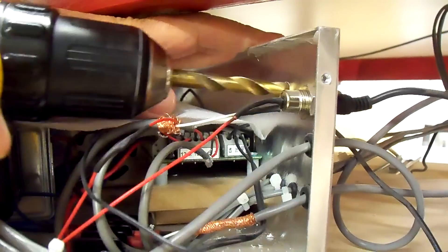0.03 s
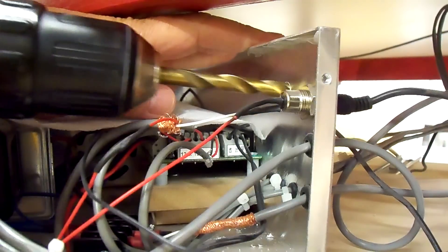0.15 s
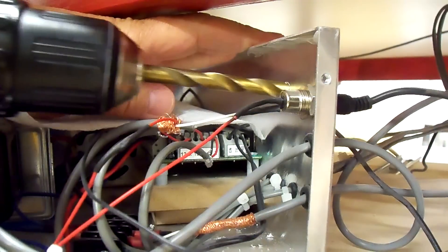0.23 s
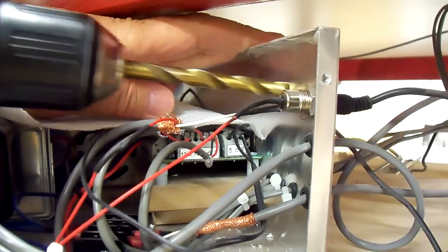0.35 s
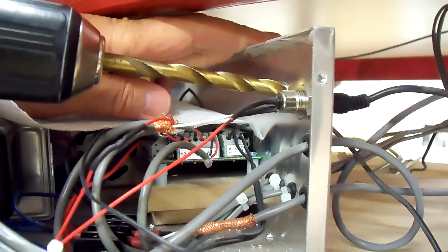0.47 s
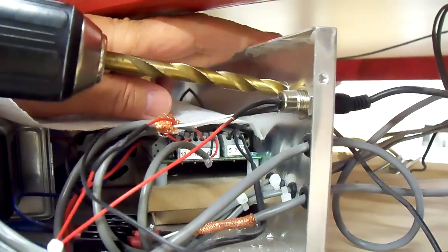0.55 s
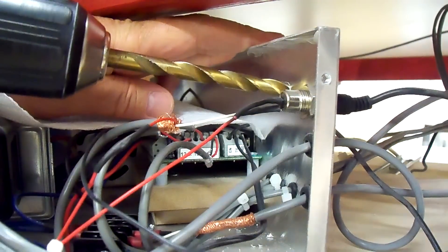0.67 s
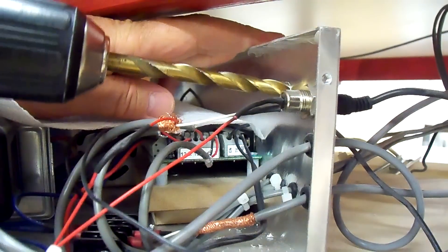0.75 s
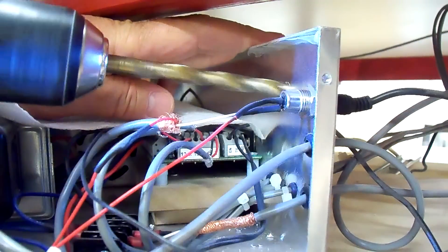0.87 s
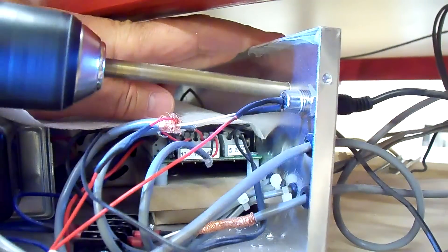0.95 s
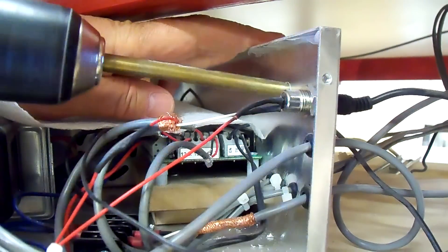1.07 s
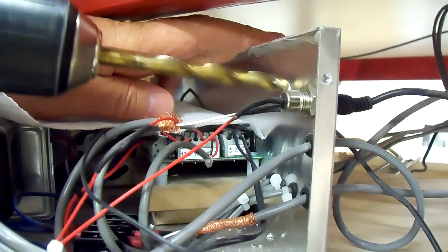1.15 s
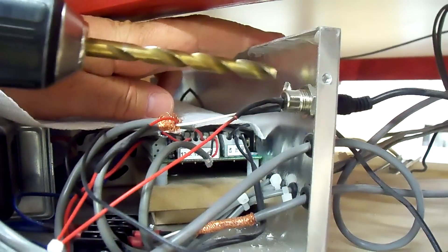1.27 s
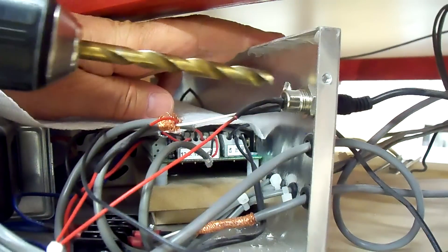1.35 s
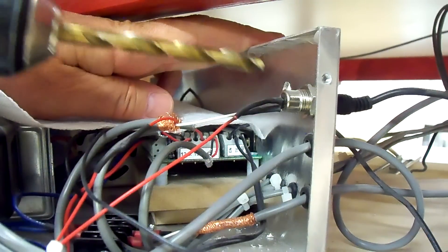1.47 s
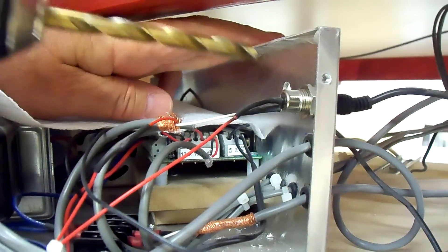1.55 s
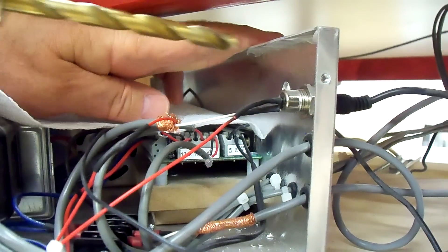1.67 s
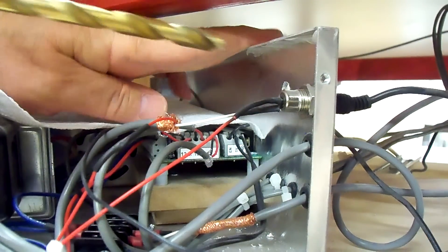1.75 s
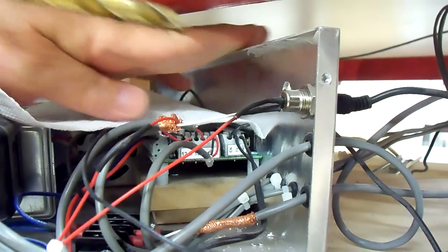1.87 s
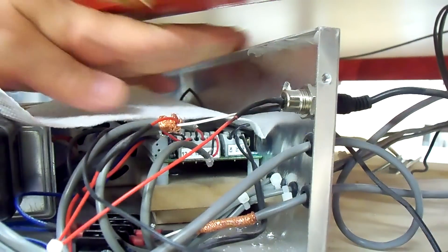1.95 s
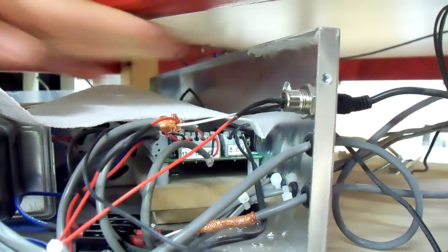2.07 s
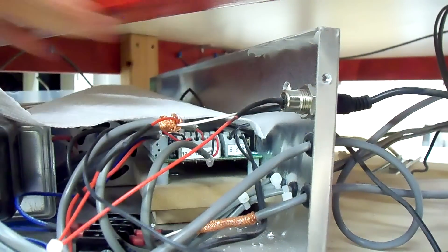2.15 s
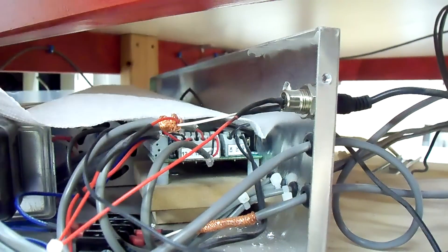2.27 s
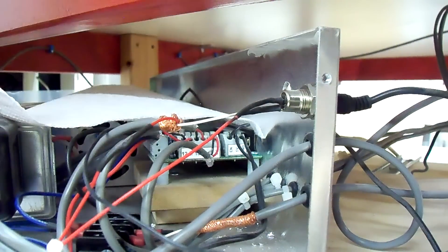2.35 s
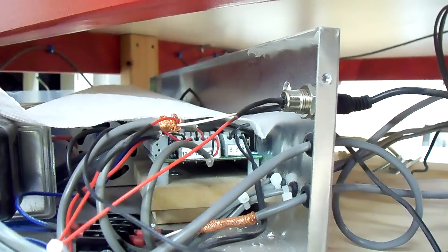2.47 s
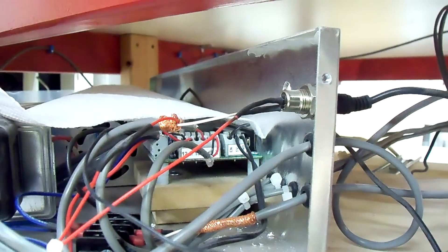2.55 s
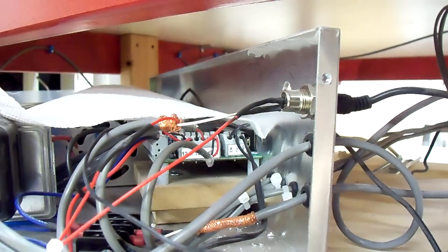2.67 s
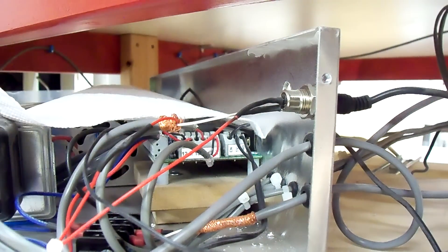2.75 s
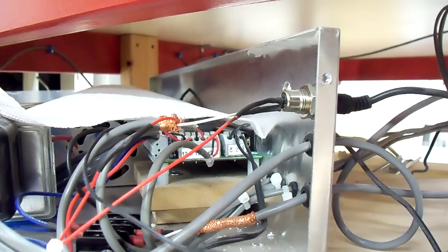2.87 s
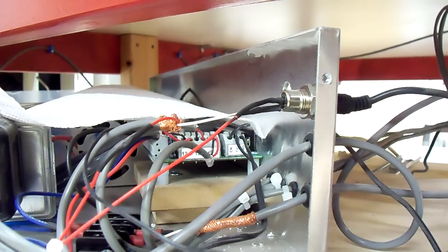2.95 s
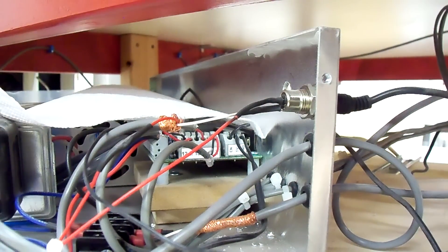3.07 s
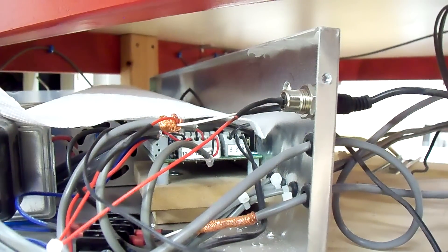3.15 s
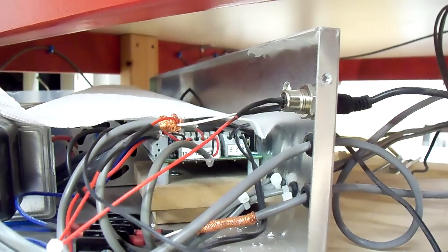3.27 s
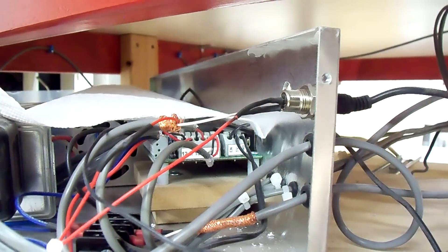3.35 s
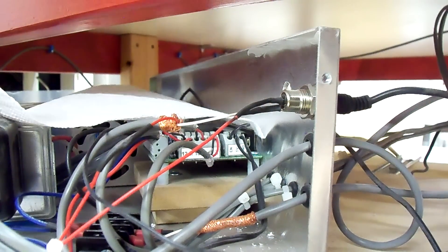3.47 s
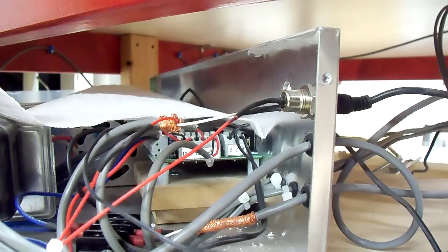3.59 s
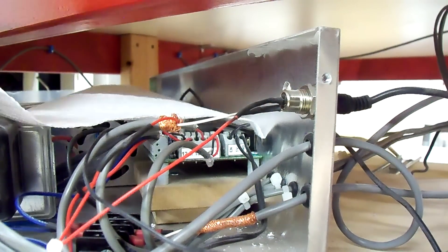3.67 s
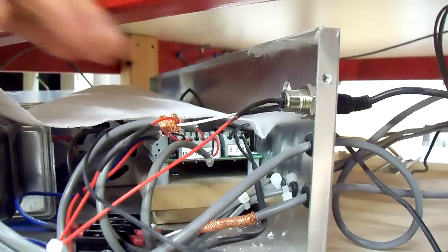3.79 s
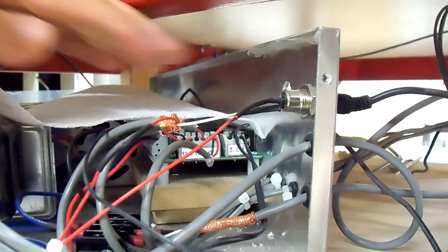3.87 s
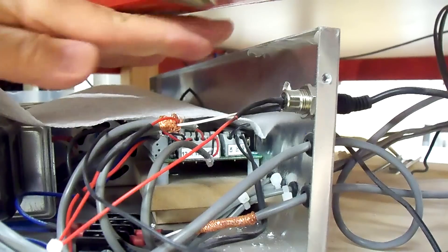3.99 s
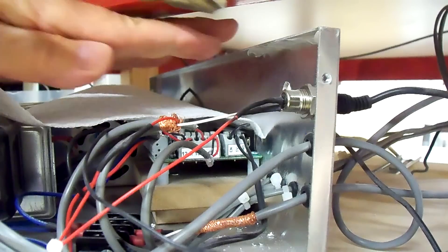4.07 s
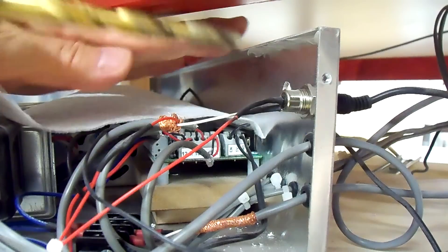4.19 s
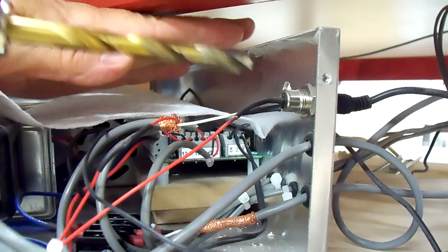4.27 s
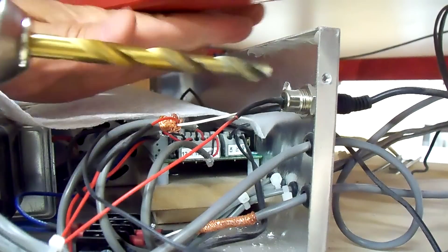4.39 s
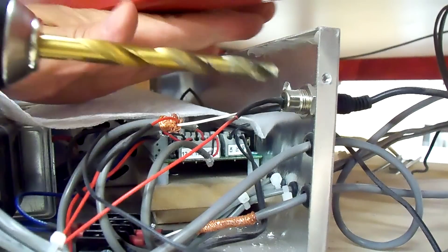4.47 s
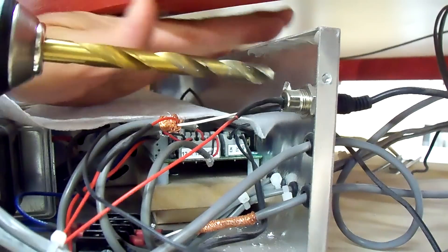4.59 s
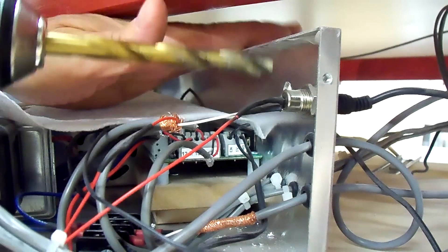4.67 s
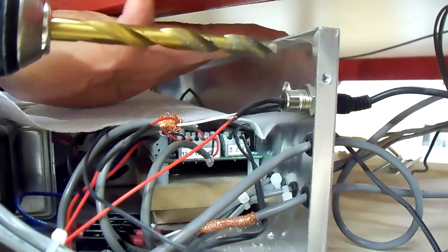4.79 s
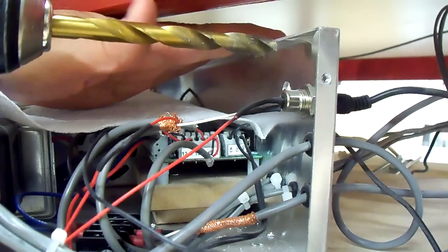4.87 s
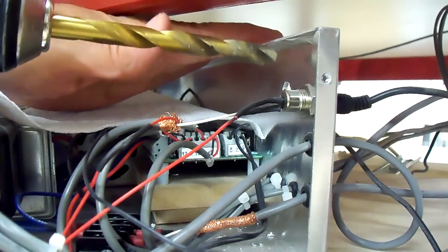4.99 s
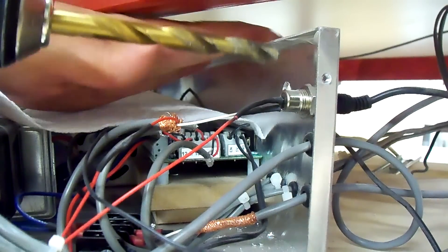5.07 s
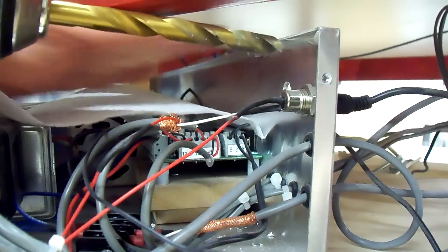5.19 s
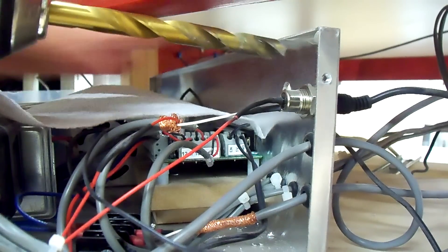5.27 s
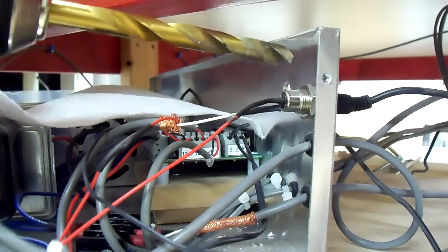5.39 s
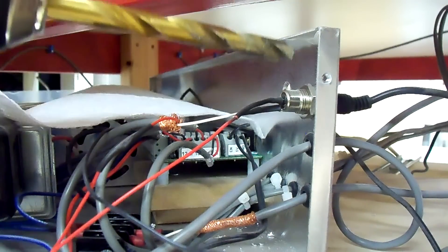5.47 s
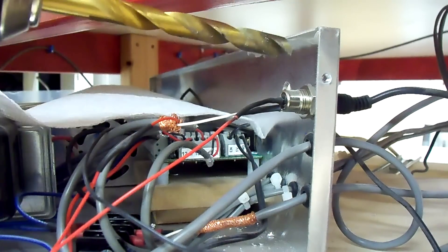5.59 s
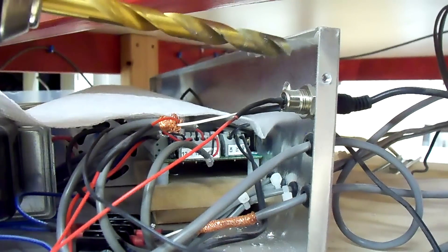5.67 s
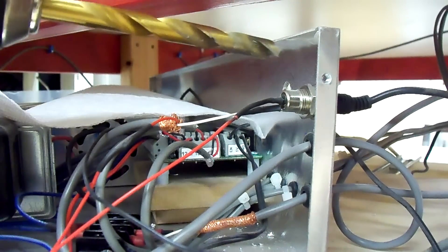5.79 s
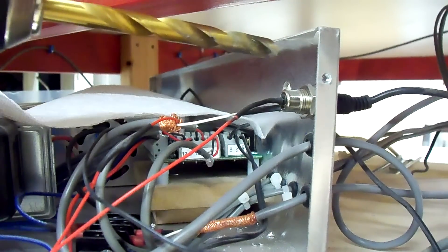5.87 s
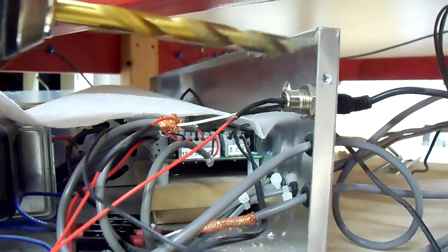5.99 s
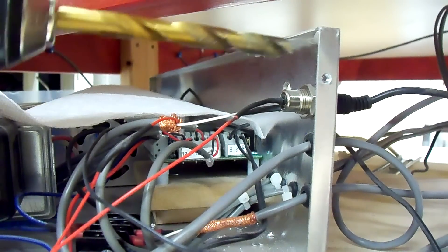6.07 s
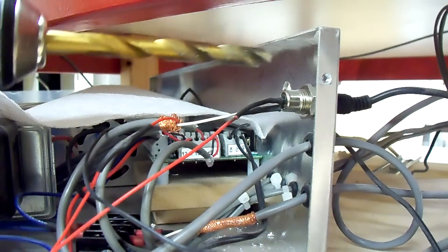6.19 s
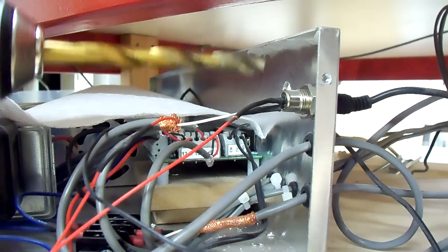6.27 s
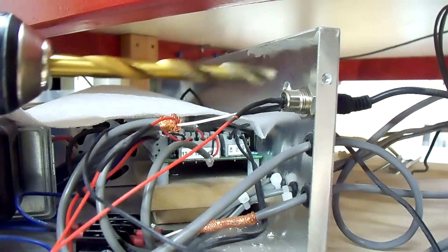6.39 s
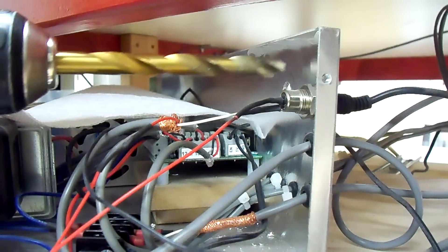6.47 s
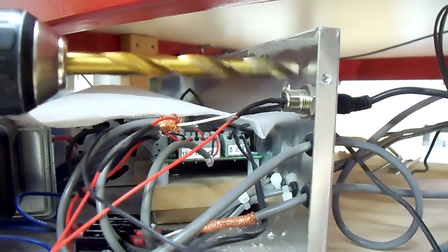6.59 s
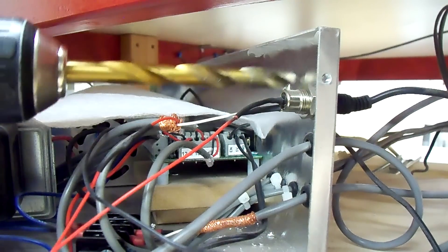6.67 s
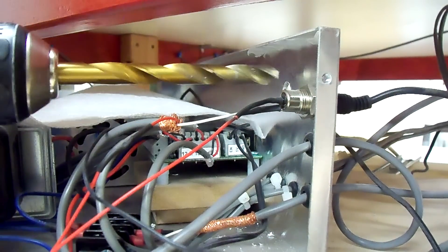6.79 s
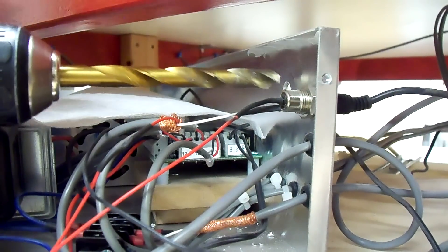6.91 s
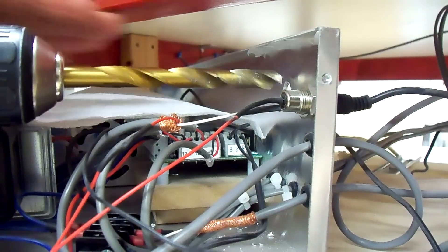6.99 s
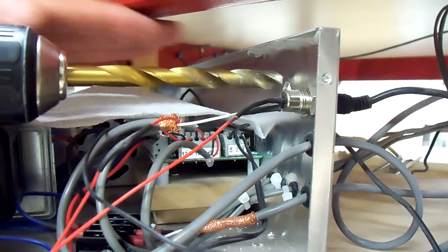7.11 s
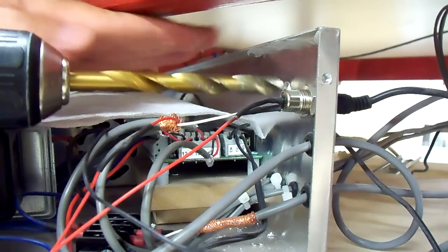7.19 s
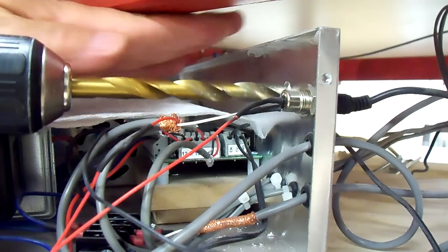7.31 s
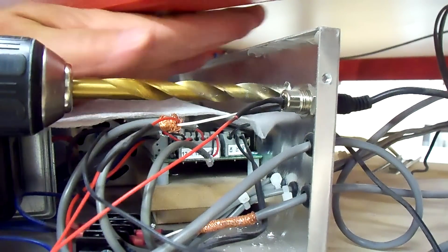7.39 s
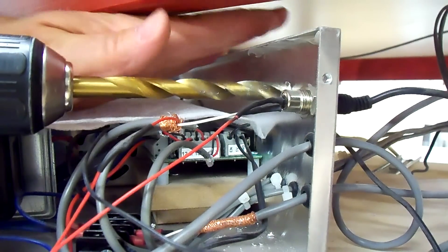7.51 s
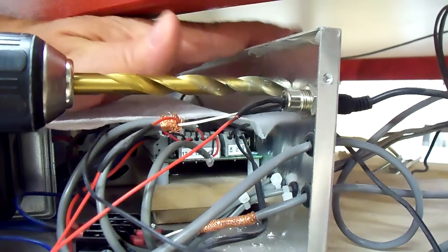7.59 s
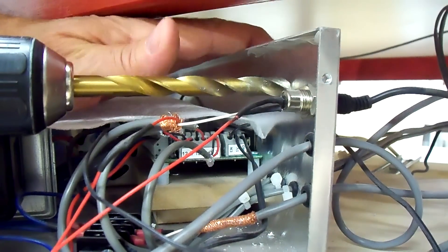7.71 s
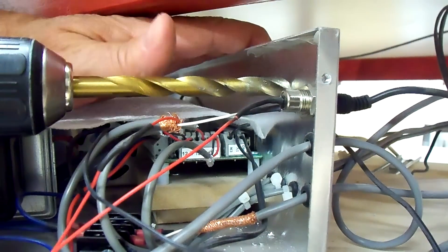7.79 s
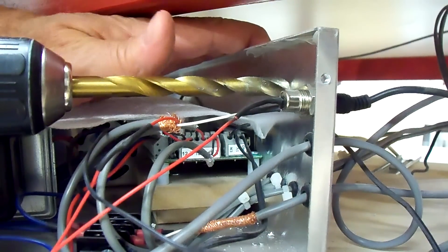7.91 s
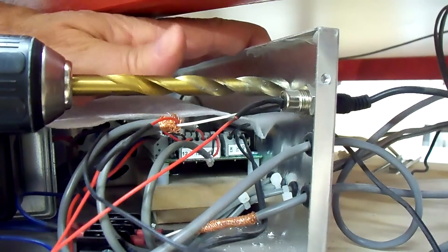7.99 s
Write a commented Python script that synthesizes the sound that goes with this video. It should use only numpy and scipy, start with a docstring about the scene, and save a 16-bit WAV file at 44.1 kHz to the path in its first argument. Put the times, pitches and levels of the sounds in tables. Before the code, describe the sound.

A sharp metallic knock, then a quarter-second cordless drill burst clattering in a metal box, followed by paper rubs, light clicks and a hissing bit slide.

```python
"""Knocks and scrapes come first: a cordless drill's bit in a hole in the wall of an aluminium box, heard close.
The motor spins for a quarter second until the bit catches; rubs, clicks and a sliding bit follow.
A hand rubs a sheet of paper in the box, amid faint swells of noise, all of dense grains; knocks ring wall modes.
The drill is gear clatter and shaft tones that follow one speed curve; a small workroom adds its tail.
Behind lie coloured hiss, air, rumble and mains hum, which step up at 2.7 s and then swell."""
import sys
import numpy as np
from scipy import signal
from scipy.fft import rfft, irfft, next_fast_len
from scipy.io import wavfile
from scipy.ndimage import uniform_filter1d

SR = 44100
rng = np.random.default_rng(int(sys.argv[2]) if len(sys.argv) > 2 else 0)


def int16_out(signal):
    """Quantize to a 16-bit WAV file."""
    q = np.round(np.clip(np.atleast_2d(signal).T, -1, 1) * 32767)
    wavfile.write(sys.argv[1], SR, q.astype(np.int16))


N = 354991
TIME = np.arange(N) / SR

# All levels of the work at the box are ahead of the balance in scene().
# modes of the box wall: (frequency [Hz], level [dB], t60 [s])
PANEL = [(720, -3, .04), (889.5, -7.5, .04), (1104, -2.5, 0.027), (1220, -4, .04), (1371, -3, 0.029),
         (1497, -1, 0.028), (1699, -2.5, 0.019), (1993, -4.5, .035), (2196, 2, 0.015), (2407, -8, 0.033),
         (2730, 3.5, 0.014), (3100, -1, 0.015), (3530, 0.5, 0.0091), (3804, 1, 0.021), (4250, -4.5, .015)]
# colour of a low thud: (frequency [Hz], density [dB per Hz])
THUD = [(30, -14), (150, -1.5), (300, 1.5), (700, 3), (1100, -6), (2500, -41.5)]
# colour of a bright tick: (frequency [Hz], density [dB per Hz])
TICK = [(700, -26), (2000, -9), (3500, -6), (5300, 0.5), (6500, -6), (7900, -1.5), (10000, -4),
        (14000, -5.5)]


def amp(db):
    """Decibels to gain."""
    return 10 ** (np.asarray(db) / 20)


def unit(x):
    """Scales to an rms of one."""
    return x / np.sqrt(np.mean(x ** 2) + 1e-20)


def read(points, hz):
    """Reads a curve on a log-frequency axis."""
    f, value = np.transpose(points)
    return np.interp(np.log(hz + 1), np.log(f + 1), value)


def add(mix, s, sound):
    """Mixes a sound in at a time in seconds."""
    part = mix[max(0, round(s * SR)):][:len(sound)]
    part += sound[:len(part)]


def colour(x, points):
    """Filters a signal by a spectrum and scales it to an rms of one."""
    size = next_fast_len(len(x))
    gain = amp(read(points, np.fft.rfftfreq(size, 1 / SR)))
    return unit(irfft(rfft(x, size) * gain, size)[:len(x)])


def noise(points, size=N):
    """Coloured noise at an rms of one."""
    return colour(rng.standard_normal(size), points)


def wander(size, smooth):
    """Random drift of rms one, smoothed over a number of samples."""
    return unit(uniform_filter1d(rng.standard_normal(size), max(int(smooth), 1)))


def envelope(start, attack_s, end, release_s, db_per_s):
    """A straight attack, a hold that drifts in level, and an exponential release."""
    attack = np.clip((TIME - start) / attack_s, 0, 1)
    held = np.clip(TIME, start, end) - start
    release = np.exp(-np.maximum(TIME - end, 0) / release_s)
    return attack * amp(db_per_s * held) * release


def grains(per_s, spread_db, size=N):
    """Tiny impacts of uneven strength and either sign at random moments."""
    strength = amp(spread_db * np.minimum(rng.exponential(1, size), 4))
    strength = strength * rng.choice([-1, 1], size)
    return unit(strength * (rng.random(size) < per_s / SR))


def ring(x, modes):
    """Drives a set of dying modes, each at a random phase for the point of contact."""
    t = np.arange(SR // 8) / SR
    response = np.zeros(len(t))
    for hz, db, t60 in modes:
        response += amp(db - 60 * t / t60) * np.sin(2 * np.pi * (hz * t + rng.random()))
    return signal.oaconvolve(x, response)[:len(x)]


def favour(x, hz, q):
    """A broad resonance: each contact spot favours the modes round one frequency."""
    b, a = signal.iirpeak(min(hz, SR / 4), max(q, .4), fs=SR)
    return signal.lfilter(b, a, x)


def blow(x, db):
    """Gives a hit the energy of a hundredth of a second at this rms level."""
    return amp(db) * x * np.sqrt(SR / 100 / (np.sum(x ** 2) + 1e-20))


def room_level(before_db, after_db, swell_db):
    """A level in dB that holds, steps up and then swells ever faster by swell_db."""
    step_s, step_rise_s, swell_power = 2.707, 0.011, 2.7
    step = np.clip((TIME - step_s) / step_rise_s, 0, 1)
    swell = np.maximum((TIME - step_s) / (TIME[-1] - step_s), 0) ** swell_power
    return before_db + (after_db - before_db) * step + swell_db * swell


def ambience(rumble_trim_db=-1, air_drift_db=1.44, rumble_drift_db=1.0):
    """Smooth coloured hiss over unevenly moving air, lumpy rumble and a sine of mains hum."""
    # colours of the room's three noises: (frequency [Hz], density [dB per Hz])
    hiss_colour = [(300, -4), (800, -3.5), (1500, 5.5), (3000, 3), (6000, -0.5), (10000, -3.5),
                   (14000, -1.5)]
    air_colour = [(90, -15), (160, -1), (230, -1.5), (370, -1), (480, -7), (620, -7), (850, -11.5),
                  (1300, -16.5), (3000, -46)]
    rumble_colour = [(5, -11.5), (20, -1), (40, -1.5), (70, -5), (110, -6.5), (170, -15.5), (400, -40.5)]
    hum_hz, hum_db = 120, -11.5  # level within the rumble layer
    hiss = amp(room_level(-78.5, -59.5, 7)) * noise(hiss_colour)
    air = amp(room_level(-73.5, -57.3, 7.5) + air_drift_db * wander(N, 2700)) * noise(air_colour)
    rumble = amp(rumble_trim_db + rumble_drift_db * wander(N, 4400)) * noise(rumble_colour)
    hum = amp(hum_db) * np.sqrt(2) * np.sin(2 * np.pi * (hum_hz * TIME + rng.random()))
    return hiss + air + amp(room_level(-61, -56, 8)) * (rumble + hum)


def reverb(x, build_s=0.0027):
    """A small workroom: a diffuse noise tail whose treble dies first."""
    # decay of the room: (frequency [Hz], t60 [s])
    room_t60 = [(100, .45), (1000, .31), (4000, .27), (8000, .22), (14000, .21)]
    hz, t, z = signal.stft(rng.standard_normal(SR // 2), SR, nperseg=256)
    tail = signal.istft(z * amp(-60 * t / read(room_t60, hz)[:, None]), SR)[1]
    tail = tail * (1 - np.exp(-np.arange(len(tail)) / SR / build_s))
    return signal.oaconvolve(x, tail / np.linalg.norm(tail))[:N]


def walls(x):
    """Close echoes between the box's walls comb the sound, so that it is hollow and tinny."""
    # echoes: (delay [s], gain [linear])
    echoes = [(.001135, 0.1), (.00227, 0.066), (.0046, .14)]
    return x + sum(gain * np.interp(TIME - delay, TIME, x, left=0) for delay, gain in echoes)


def thumps():
    """The whole box rocks on its shelf: a few dying swings of its weight."""
    # swings: (time [s], frequency [Hz], level [dB], t60 [s])
    swings = [(0.484, 47.7, -45, 0.33), (6.661, 74, -35.5, 0.13)]
    out, t = np.zeros(N), np.arange(SR // 2) / SR
    for s, hz, db, t60 in swings:
        add(out, s, amp(db - 60 * t / t60) * np.sin(2 * np.pi * hz * t))
    return out


def friction(hiss, body, spectrum, grains_per_s, spread_db, flutter_db, wall_db, sing_db=-3):
    """Dense grains hiss directly, sound through the box and ring its wall; their level flutters."""
    # colour of the box: (frequency [Hz], density [dB per Hz])
    box_colour = [(100, -6), (400, -1.5), (900, -7), (1350, -0.5), (1580, -5.5), (1900, -5.5), (2650, -4),
                  (3500, -5.5), (6000, -18)]
    # modes of the walls under a rubbing hand: (frequency [Hz], level [dB], t60 [s])
    singing_modes = [(1530, -11, 0.035), (1560, 8, 0.019), (2593, -3, .025), (3500, -4, 0.022),
                     (5300, -5, 0.027), (7760, 0, 0.017)]
    grit = grains(grains_per_s, spread_db) * amp(flutter_db * wander(N, 500))
    leaning = (TIME > 4.5) & (TIME < 5.3)  # the wall sings while the hand leans on it
    singing = leaning * amp(sing_db) * unit(ring(grit, singing_modes))
    box = amp(wall_db) * colour(grit, box_colour) + singing
    return hiss * colour(grit, spectrum) + body * box


def rubs():
    """Rubs and faint swells of noise: each is one arch of level, and overlapping arches add in power."""
    # rubs and faint swells of noise: (time [s], length [s], hiss level [dB], box ring level [dB])
    arches = [(.03, 0.43, -71, -58.5), (1.79, .15, -72, -68), (1.86, .1, -70, -80), (1.95, .12, -67, -76),
              (2.05, 0.47, -74, -79), (2.87, 0.077, -61, -45.5), (2.93, 0.13, -63, -48),
              (3.068, 0.13, -56.5, -48), (3.352, 0.076, -57, -72), (3.52, 0.16, -69, -52.5),
              (3.943, 0.62, -65, -59), (4.559, 0.16, -48.5, -53), (4.806, 0.31, -56, -56),
              (5.03, .17, -50, -50), (5.088, .064, -42.5, -47), (5.135, .083, -45, -60),
              (5.43, .13, -59, -75), (6.0, 0.28, -58, -53), (6.267, 0.14, -54.5, -56),
              (6.437, 0.11, -55.5, -57), (7.12, .075, -54, -72)]
    # colour of their hiss: (frequency [Hz], density [dB per Hz])
    rub_colour = [(600, -5), (2000, -20), (4000, -8.5), (5300, 0.5), (6600, -3), (7800, -2), (9800, -0.5),
                  (11300, 2.5), (14000, 0.5)]
    skew, roundness = 1, 0.78  # a skew above 1 would peak later; a smaller roundness is broader
    hiss, body = np.zeros((2, N))
    for s, length, hiss_db, ring_db in arches:
        phase = np.linspace(0, 1, int(length * SR)) ** skew
        arch = abs(np.sin(np.pi * phase)) ** roundness
        add(hiss, s, (amp(hiss_db) * arch) ** 2)
        add(body, s, (amp(ring_db) * arch) ** 2)
    return friction(np.sqrt(hiss), np.sqrt(body), rub_colour,
                    grains_per_s=11000, spread_db=0.0, flutter_db=1.4, wall_db=-3)


def slide():
    """The flutes slide along the rim of the hole: a sudden hiss that fades as they slow, and stops."""
    # colour of the slide's hiss: (frequency [Hz], density [dB per Hz])
    slide_colour = [(80, -20), (300, -1), (900, -4.5), (1400, -5), (2200, -21), (4000, -10), (8000, -6),
                    (11000, -7), (11900, 0), (12600, -7), (13600, -6.5)]
    start_s, seated_s, end_s = 7.491, 7.512, 7.64  # the box joins in once the tip has dropped in
    attack_s, fade_db_per_s = 0.008, -79
    hiss = amp(-29.2) * envelope(start_s, attack_s, end_s, .013, fade_db_per_s)
    body = amp(-34) * envelope(seated_s, attack_s, end_s, .04, fade_db_per_s)
    return friction(hiss, body, slide_colour,
                    grains_per_s=23000, spread_db=-0.5, flutter_db=1.5, wall_db=-3.5)


def squeaks(unsteady_hz=80, flutter_db=3.6):
    """Steel squeaks as it slips: short gliding whistles, shaky in pitch and strength."""
    # whistles: (time [s], length [s], start [Hz], end [Hz], level [dB])
    whistles = [(0.153, 0.044, 1477, 1190, -56), (0.2, .06, 1373, 1190, -57),
                (0.233, 0.038, 1724, 1710, -53.5), (.303, .022, 1730, 1750, -59),
                (0.375, .022, 5050, 5000, -60), (.406, .031, 5130, 5150, -62), (0.406, .025, 743, 710, -55),
                (0.416, .032, 1370, 1430, -56), (.713, 0.042, 1110, 1060, -64.5),
                (6.282, .08, 2660, 2460, -59), (6.384, .047, 7380, 7220, -58),
                (6.457, 0.067, 1900, 1870, -57.5), (6.49, .05, 7250, 7300, -63),
                (7.296, .022, 1500, 1460, -44), (7.366, 0.024, 1543, 1550, -46)]
    out = np.zeros(N)
    for s, length, start_hz, end_hz, db in whistles:
        size = int(length * SR)
        hz = np.linspace(start_hz, end_hz, size) + unsteady_hz * wander(SR // 8, 53)[:size]
        flutter = amp(flutter_db * wander(SR // 8, 130)[:size])
        whistle = np.sin(2 * np.pi * np.cumsum(hz) / SR) * flutter
        add(out, s, amp(db) * unit(whistle * signal.windows.tukey(size, .6)))
    return out


def scrapes(slips_per_s=1500, spread_db=3, q=3.6, body_db=-4.5):
    """The bit's edge sticks and slips on the metal, and each slip rings the wall."""
    # drags: (time [s], length [s], ring level [dB], ring centre [Hz], hiss level [dB])
    drags = [(.135, 0.26, -59.5, 1430, -66), (.371, .036, -55.5, 1520, -58), (.407, .067, -55, 1470, -58),
             (7.295, 0.019, -43.5, 1400, -51), (7.315, .032, -43, 1400, -52),
             (7.368, .037, -43.5, 1380, -55)]
    out = np.zeros(N)
    for s, length, ring_db, ring_hz, hiss_db in drags:
        size = int(length * SR)
        stroke = np.pad(signal.windows.tukey(size, .4), (0, SR // 20))  # room for the ring to die
        slips = grains(slips_per_s, spread_db, size=len(stroke)) * stroke
        wall = unit(favour(ring(slips, PANEL), ring_hz, q)) + amp(body_db) * colour(slips, THUD)
        hiss = unit(noise(TICK, size=len(stroke)) * stroke)
        padding_gain = np.sqrt(size / len(stroke))
        add(out, s, (amp(ring_db) * wall + amp(hiss_db) * hiss) * padding_gain)
    return out


def strike(s, db, modes, contact_t60, click_db):
    """One clean blow of metal on metal: a noise click and a short ring of modes."""
    out, t = np.zeros(N), np.arange(SR // 8) / SR
    click = noise(TICK, size=len(t)) * amp(-60 * t / contact_t60)
    ringing = ring(signal.unit_impulse(len(t)), modes)
    add(out, s, blow(ringing, db) + blow(click, db + click_db))
    return out


def chink():
    """The chuck's steel jaws chink once, in high modes."""
    # modes of the jaws: (frequency [Hz], level [dB], t60 [s])
    jaws = [(5370, -14, 0.039), (7400, -10, 0.044), (9700, -9, .02), (11370, -4, .03), (12000, 0, 0.055),
            (12765, -11, .04), (13500, -8, .04)]
    return strike(6.0768, -33, jaws, contact_t60=.035, click_db=-5)


def clack():
    """The bit clacks once on the top edge of the wall, in lower modes."""
    # modes of the edge: (frequency [Hz], level [dB], t60 [s])
    edge = [(1100, -5, 0.096), (1290, -4, 0.049), (1390, -1, 0.02), (1480, -2, 0.028), (1600, -5, 0.034),
            (2080, -3, 0.022), (2240, -1.5, 0.041), (2370, -3, .022), (3240, -9, 0.018), (3630, -8, 0.018)]
    return strike(4.689, -28.5, edge, contact_t60=.025, click_db=-7)


def contact(thud_db, ring_db, ring_hz, tick_db, t60, rise_s=0.00053, thud_longer=2.1, chatter=0.54, q=1.7):
    """One contact is a short chatter of noise: a low thud, the wall's ring and a bright tick."""
    t = np.arange(SR // 2) / SR
    attack = 1 - np.exp(-t / rise_s)
    thud = noise(THUD, size=len(t)) * attack * amp(-60 * t / (t60 * thud_longer))
    chattering = rng.standard_normal(len(t)) * amp(-60 * t / (t60 * chatter))
    wall = favour(ring(chattering, PANEL), ring_hz, q)
    tick = noise(TICK, size=len(t)) * attack * amp(-60 * t / t60)
    return blow(thud, thud_db) + blow(wall, ring_db) + blow(tick, tick_db)


def knocks():
    """Bit and chuck knock on the box, the paper snaps and the drill clicks in the grip: brief contacts."""
    # knocks and snaps: (time [s], thud level [dB], ring level [dB], ring centre [Hz],
    # tick level [dB], tick t60 [s])
    hits = [(.001, -32.5, -16.5, 1470, -13, .02), (.0055, -35.5, -19.5, 1740, -17.5, .011),
            (0.0223, -34.5, -27.5, 1870, -23, 0.023), (0.0336, -31, -31, 1800, -25, .014),
            (.463, -44.5, -48.5, 1500, -52, 0.057), (.475, -54, -43.5, 1650, -52, .022),
            (.824, -60, -59.5, 1250, -69, .015), (.9, -57, -54, 2010, -48, .021),
            (.925, -55, -41.5, 2395, -39, .016), (1.157, -48, -23, 1850, -17.5, .02),
            (1.16, -29.5, -22.5, 2190, -16.5, .019), (1.202, -47, -44, 1600, -55, .018),
            (1.212, -55.5, -45, 2340, -39.5, .011), (1.604, -55.5, -69, 950, -82, 0.029),
            (1.69, -60.5, -81, 870, -83, .047), (1.826, -60, -57, 1350, -62, .039),
            (2.979, -43.5, -41, 1100, -45, .06), (2.998, -46, -46, 1100, -49, 0.1),
            (3.114, -62, -42, 2380, -49, 0.04), (3.67, -43, -50, 1830, -41, 0.24),
            (3.8226, -46, -54, 2680, -23.5, .036), (3.824, -37, -36, 1900, -21, 0.33),
            (5.388, -74, -49, 1450, -48.5, .12), (5.847, -40.5, -45.5, 1250, -51, 0.037),
            (6.0634, -38, -34, 1400, -39, 0.04), (6.6503, -50, -29.5, 1750, -38.5, 0.0084),
            (6.663, -43, -43, 1400, -51, .048), (7.405, -40, -32, 1550, -41, .017),
            (7.512, -30.5, -29, 1300, -38, .013), (7.5162, -51, -26.5, 1400, -37.5, 0.021),
            (7.682, -39.5, -38.5, 3170, -44, 0.0074)]
    # light clicks in the grip, all of one colour: (time [s], tick level [dB])
    clicks = [(.844, -60), (4.321, -48.5), (5.124, -41), (5.455, -47), (5.72, -46), (6.276, -47.5),
              (6.357, -46.5), (6.388, -48)]
    out = np.zeros(N)
    for s, *hit in hits:
        add(out, s, contact(*hit))
    for s, db in clicks:
        add(out, s, contact(db - 17, db - 12, 1800, db, .014))
    return out


def drill(clatter_per_s=11000, spread_db=3.0, beat=.25, shake_db=-25, chatter_db=4.4):
    """Brushes and gear teeth clatter, beating once a turn, over uneven shaft tones and a starting whine."""
    # motor and gear tones: (multiple of the shaft [1], level [dB])
    orders = [(1, -6.5), (2, -4.5), (4, -9), (5, -5.5), (6, -2)]
    # colour of the clatter: (frequency [Hz], density [dB per Hz])
    gearbox = [(30, -10.5), (120, -12), (310, 1.5), (420, -4.5), (1100, -6), (1550, -2), (2000, -5.5),
               (2400, -7.5), (3750, -4.5), (4150, -2.5), (5300, 1), (7300, -4), (11000, -3.5), (13600, -3)]
    # colour of the shaking shelf: (frequency [Hz], density [dB per Hz])
    shake_colour = [(10, -12), (35, 1.5), (60, 1), (110, -12), (250, -33)]
    # one pull of the trigger: the motor winds up, and brakes when the bit catches
    pull_s, spin_up_s, spin_up_power = .893, .057, 2.5
    brake_s, braking_s = 1.15, .038
    full_turns_per_s = 328
    lag = np.exp(-(np.maximum(TIME - pull_s, 0) / spin_up_s) ** spin_up_power)
    speed = (1 - lag) * np.exp(-np.maximum(TIME - brake_s, 0) / braking_s)  # share of full speed
    turns = np.cumsum(full_turns_per_s * speed * (1 + .035 * wander(N, 130))) / SR

    # the bit chatters in the hole, so each tone swells and breaks off on its own
    tones = np.zeros(N)
    for k, db in orders:
        tones += amp(db + chatter_db * wander(N, 400)) * np.sin(2 * np.pi * (k * turns + rng.random()))
    strain = 1 + 18 * lag  # the tones are stronger while the motor winds up
    gears = amp(-41.5) * speed ** 4.5 * strain * tones

    once_a_turn = 1 + beat * np.cos(2 * np.pi * turns)
    clatter = colour(grains(clatter_per_s, spread_db) * once_a_turn, gearbox)
    shake = amp(shake_db) * noise(shake_colour)
    rattle = amp(-25.9) * speed ** 1.75 * (clatter + shake)

    # the speed controller sings at 7750 Hz, ever louder, until the trigger is fully in after .08 s
    squeeze = envelope(pull_s, .006, pull_s + .08, .008, db_per_s=110)
    whine = amp(-59) * squeeze * np.sqrt(2) * np.sin(2 * np.pi * 7750 * TIME)
    return rattle + gears + whine


def scene(wet_db=-16.5, ambience_db=0.77, work_db=-1.46):
    """The work at the box with its close echoes, the workroom's tail and the background."""
    grainy = rubs() + slide()
    metal = thumps() + squeaks() + scrapes() + chink() + clack() + knocks()
    work = amp(work_db) * walls(grainy + metal + drill())
    return (amp(ambience_db) * ambience() + amp(wet_db) * reverb(work) + work)[None]


def record(dry, ceiling=1.0):
    """Two narrow notches are cut and the hardest knocks are rounded off; then the band limit."""
    for hz, width_hz in [(3900, 57), (10050, 64)]:
        dry = signal.lfilter(*signal.iirnotch(hz, hz / width_hz, fs=SR), dry)
    dry = ceiling * np.tanh(dry / ceiling)
    lowpass = signal.firwin(511, 14050, window=("kaiser", 9), fs=SR)  # cutoff in Hz
    return signal.oaconvolve(dry, lowpass[None], "same")


dry = scene()
out = record(dry)
int16_out(out)
```